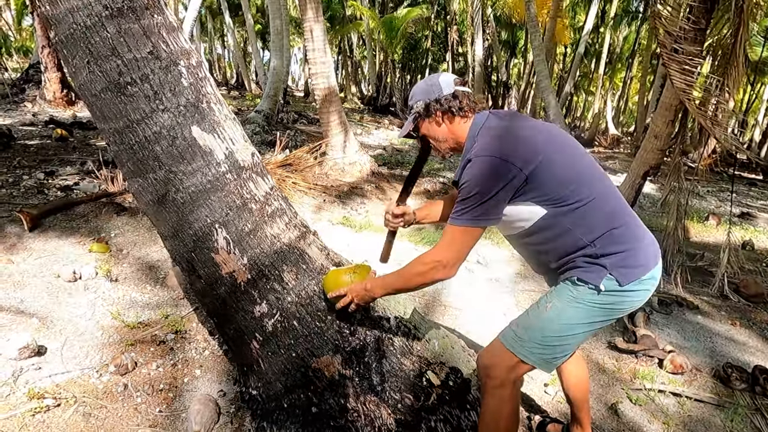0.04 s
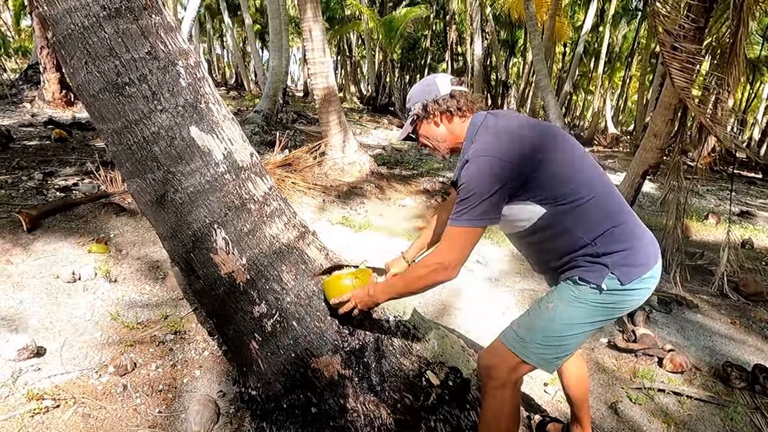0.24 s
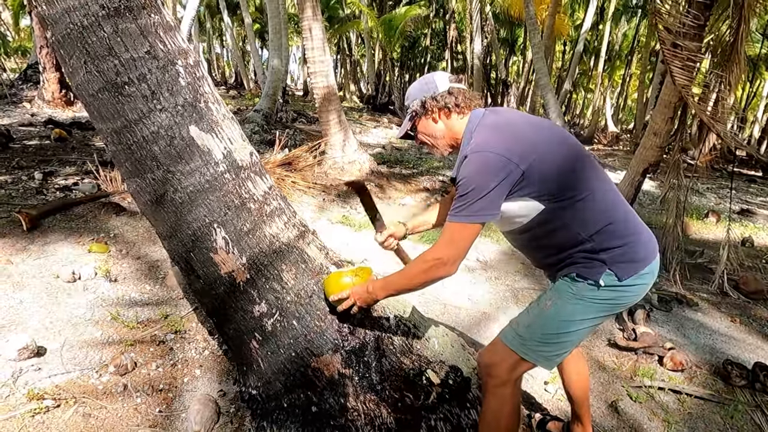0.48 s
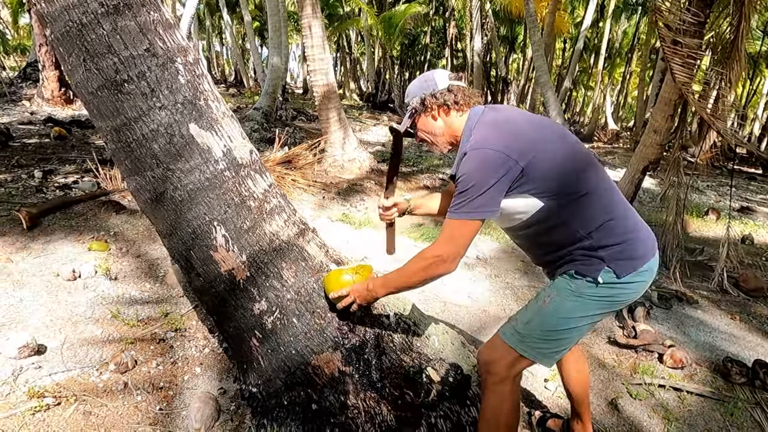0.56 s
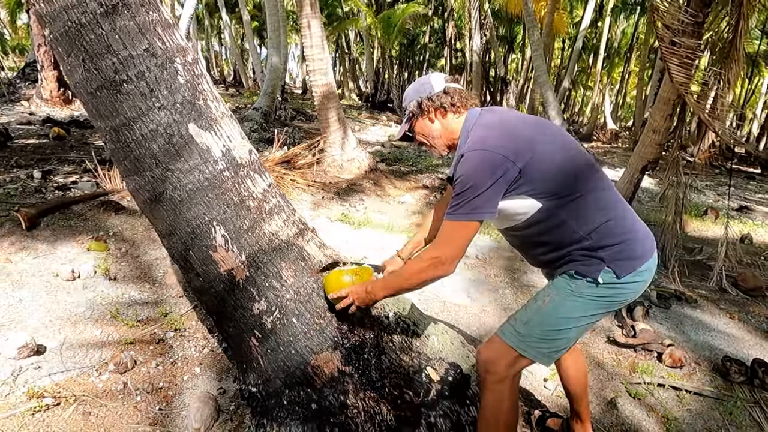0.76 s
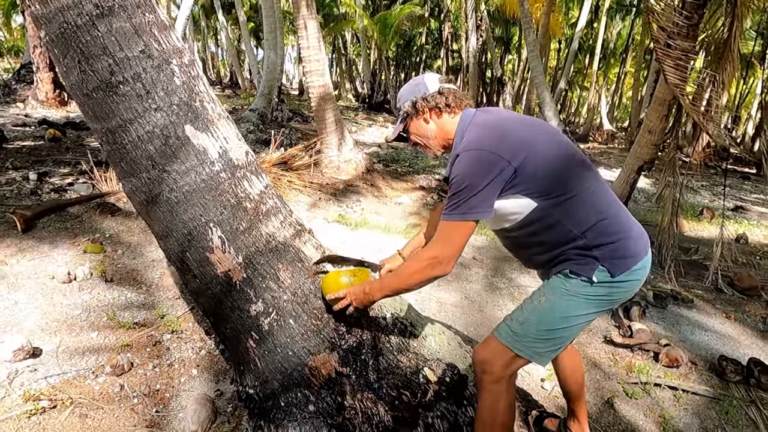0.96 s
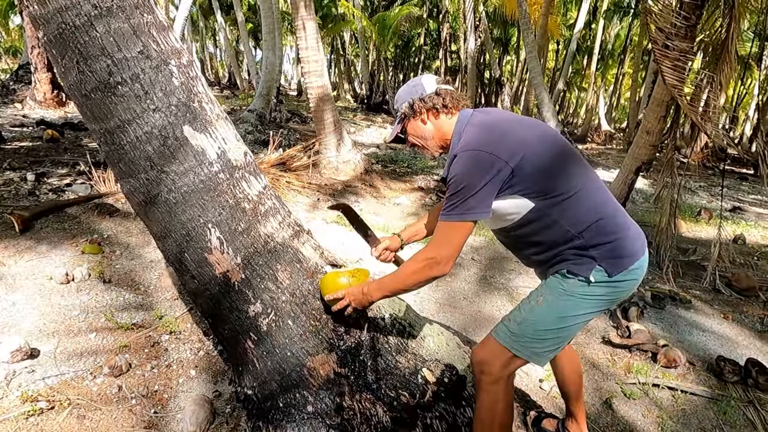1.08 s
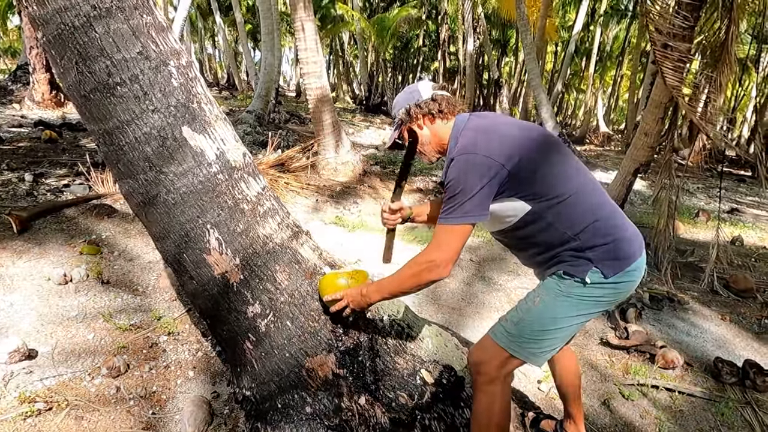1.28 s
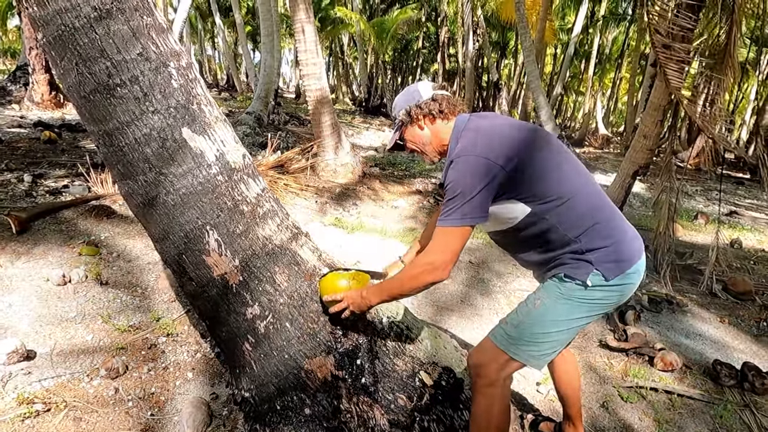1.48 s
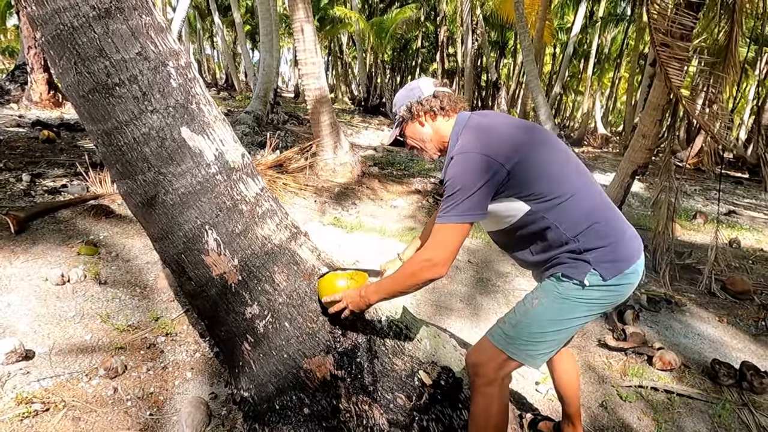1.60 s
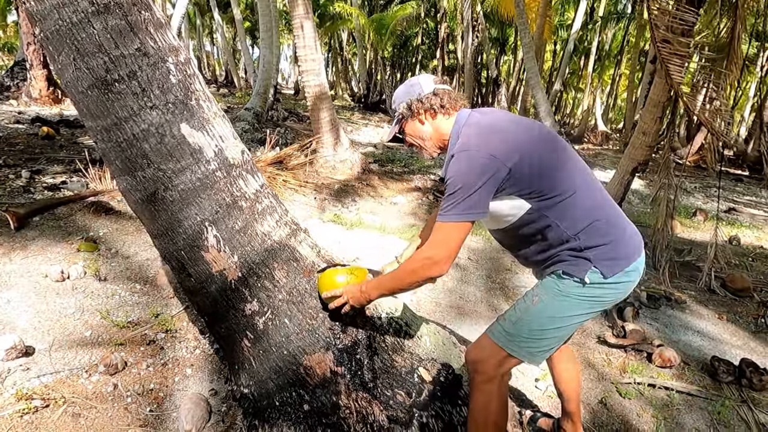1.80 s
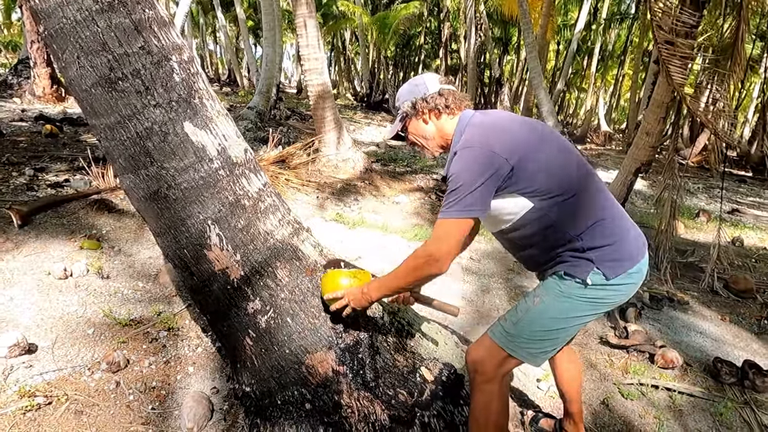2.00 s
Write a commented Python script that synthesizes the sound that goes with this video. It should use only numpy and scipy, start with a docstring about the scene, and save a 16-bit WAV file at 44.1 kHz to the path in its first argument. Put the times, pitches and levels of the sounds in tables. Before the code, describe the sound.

Three hard machete chops into a green coconut braced on a palm trunk, light wind behind

```python
"""Machete on a green coconut

Three machete chops into a green coconut held against a palm trunk, under an almost even wind hiss in the palms.
Each blow is filtered showers of random clicks for the husk fibres, damped sines for blade, nut and trunk,
then a second clack and knock as the blade bites deeper. Most of the small creaks and bumps follow the second
blow, as the blade is worked loose. Wind is shaped noise; a short decaying noise tail gives the blows an echo.
"""
import sys
import numpy as np
from scipy import signal
from scipy.fft import rfft, irfft
from scipy.io import wavfile

SR = 44100
rng = np.random.default_rng(int(sys.argv[2]) if len(sys.argv) > 2 else 0)


def inscribe(sig):
    """Save sig as 16-bit PCM at rate SR to the path in sys.argv[1].

    A 1-D sig is mono; a 2-D sig holds one channel per row.
    Samples are clipped to [-1, 1] before scaling.
    """
    pcm = np.round(np.clip(np.atleast_2d(sig).T, -1, 1) * 32767)
    wavfile.write(sys.argv[1], SR, pcm.astype(np.int16))


N = 90404
T = np.arange(N) / SR


def from_db(db):
    """Decibels to gain."""
    return 10 ** (np.asarray(db) / 20)


def rms_one(x):
    """Scale to unit rms."""
    return x / np.sqrt(np.mean(x ** 2) + 1e-20)


def colour(x, points, keep_power=True):
    """Causal, minimum-phase filter through (Hz, dB) points; keep_power evens out its overall gain."""
    size = 2 * N
    hz, db = np.transpose(points)
    bin_hz = np.arange(N + 1) * SR / size
    gain = from_db(np.interp(np.log(bin_hz + 1), np.log(hz), db))
    if keep_power:
        gain = rms_one(gain)
    # folding the cepstrum onto positive time makes the filter minimum-phase
    cepstrum = irfft(np.log(gain))
    cepstrum[1:N] *= 2
    cepstrum[N + 1:] = 0
    response = np.exp(rfft(cepstrum))
    return irfft(rfft(x, size) * response)[:N]


def low_pass(x, hz):
    """Gentle second-order roll-off."""
    sos = signal.butter(2, min(hz, 0.45 * SR), fs=SR, output="sos")
    return signal.sosfilt(sos, x + 1e-18)


def high_pass(x, hz):
    """Second-order low cut."""
    sos = signal.butter(2, hz, "high", fs=SR, output="sos")
    return signal.sosfilt(sos, x + 1e-18)


def since(s):
    """Time since an event, zero before it."""
    return np.maximum(T - s, 0)


def wind():
    """A nearly even hiss of palm leaves over a lumpy low rumble that comes and goes, both coloured noise."""
    # tone of the leaves: (frequency [Hz], relative level [dB])
    leaf_tone = [(20, -24), (50, -5.5), (110, -6), (180, -5), (310, -2.5), (450, -5), (650, -8),
                 (1100, -13), (1500, -12), (2700, -11.5), (4400, -14), (6000, -19.5), (8000, -25),
                 (10600, -32), (13000, -38.5), (16000, -33)]
    # slow drift of the leaf hiss: (time [s], level shift [dB])
    breeze = [(0, 0.5), (0.4, -0.2), (0.8, 0.25), (1.3, -0.16), (1.65, -1.5), (2.05, 0)]
    # low rumble of the wind, before its lumps: (time [s], level [dB])
    gusts = [(0, -65), (0.55, -51), (0.63, -34), (0.72, -40), (0.95, -39), (1.08, -39), (1.18, -41.5),
             (1.27, -36), (1.45, -37), (1.56, -54), (2.05, -49)]
    # tone of the rumble: (frequency [Hz], relative level [dB])
    rumble_tone = [(20, -19), (60, -7), (130, 0), (250, -3), (450, -13), (900, -26), (3000, -41),
                   (12000, -88)]
    leaves_db, lumps_db = -36, 2.5  # base level of the leaves; rms depth of the rumble's lumps

    leaf_level = from_db(leaves_db + np.interp(T, *np.transpose(breeze)))
    leaves = leaf_level * colour(rng.standard_normal(N), leaf_tone)
    lumps = rms_one(low_pass(rng.standard_normal(N), hz=15))
    rumble_level = from_db(np.interp(T, *np.transpose(gusts)) + lumps_db * lumps)
    rumble = rumble_level * colour(rng.standard_normal(N), rumble_tone)
    return leaves + rumble


def side_hiss():
    """Faint coloured noise, of opposite sign in the two ears, so they differ."""
    # filter gain: (frequency [Hz], gain [dB])
    side_tone = [(30, -73), (5000, -78.5), (10500, -74), (12300, -58), (14000, -62), (16000, -66)]
    hiss = colour(rng.standard_normal(N), side_tone, keep_power=False)
    return hiss * np.array([[1], [-1]])


def ring(s, modes):
    """Struck modes (Hz, dB, t60 s): sines dying away exponentially."""
    t = since(s)
    out = 0
    for hz, db, t60 in modes:
        decay = 1000 ** -np.minimum(t / t60, 10)
        out = out + from_db(db) * np.sin(2 * np.pi * hz * t) * decay
    return out


def snap(s, decay_s):
    """A first contact, then a dying shower of snapping fibres: one click, then random ones."""
    fibres_per_s, spread_db, edge_share = 16000, 2, 0.6  # edge_share weighs the first contact
    signs = rng.choice([-1, 1], N)
    sizes = from_db(spread_db * rng.standard_normal(N))
    grains = signs * sizes * (rng.random(N) < fibres_per_s / SR)
    decay = np.exp(-np.minimum(since(s) / decay_s, 20))
    shower = rms_one(grains * (T > s) * decay) / np.sqrt(N)  # unit energy
    shower[int(s * SR)] -= edge_share
    return shower * np.sqrt(decay_s * SR / 2)  # longer showers carry more energy


def thump(s, hz, rise_s, sag):
    """A heavily damped swing of the nut that swells, sinks sag octaves per second (if any) and stops."""
    steepness = 5.1  # of swell and fall
    t = since(s)
    pitch = hz * 2 ** (-abs(sag) * t) * (T > s)
    phase = 2 * np.pi * np.cumsum(pitch) / SR
    swell = t / rise_s * np.exp(1 - np.minimum(t / rise_s, 20))
    return np.sin(phase) * swell ** steepness


def chops():
    """The edge cracks into the husk, fibres crunch, the blade rings briefly, nut and trunk thump."""
    # blows: (time [s], crack level before its filters [dB], crack low edge [Hz], crunch level [dB],
    #   crunch decay [s], thump level [dB], thump start pitch [Hz], pitch sag [octaves/s],
    #   blade ring level [dB], blade pitch [Hz], blade ring t60 [s])
    blows = [(0.2323, -7.5, 2090, -15, 0.006, -8, 398, 97, -3, 2520, 0.011),
             (0.8377, -9, 700, -10, 0.0041, -5.5, 384, 107, -9, 3860, .018),
             (1.4867, -13.5, 3430, -13, 0.0061, -4.5, 362, 4.1, -12, 3760, 0.025)]
    # resonances of the trunk: (pitch [Hz], level relative to the thump [dB], t60 [s])
    trunk_modes = [(183.4, -22.5, 0.16), (245, -22.5, 0.065), (420, -81, 0.046), (720, -17.5, .05),
                   (830, -30.5, 0.035), (1210, -16.5, 0.038)]
    # tone of the crack: (frequency [Hz], relative level [dB])
    crack_tone = [(500, -24), (1600, -3), (2600, 7.5), (4000, 1), (6000, 2.5), (8000, 0.5), (10500, -3),
                  (16000, -16)]
    # tone of the crunch: (frequency [Hz], relative level [dB])
    crunch_tone = [(40, -26), (150, -6.5), (450, -5.5), (800, 5.5), (1250, 1.5), (1750, 1), (2600, -1),
                   (4000, 1), (5300, -4), (7500, -10.5), (16000, -28.5)]
    crack_decay_s, crunch_delay_s = 0.0012, 0.0012
    rise_s = 0.00424  # time for the thump to reach full swing

    cracks, crunches, body = 0, 0, 0
    for (s, crack_db, edge_hz, crunch_db, crunch_decay_s, thump_db, thump_hz, sag,
         blade_db, blade_hz, blade_t60) in blows:
        cracks = cracks + from_db(crack_db) * high_pass(snap(s, crack_decay_s), edge_hz)
        crunches = crunches + from_db(crunch_db) * snap(s + crunch_delay_s, crunch_decay_s)
        nut = thump(s, thump_hz, rise_s, sag)
        trunk = ring(s + rise_s / 2, trunk_modes)
        blade = ring(s + crunch_delay_s, [(blade_hz, blade_db, blade_t60)])
        body = body + from_db(thump_db) * (nut + trunk) + blade
    return colour(cracks, crack_tone) + colour(crunches, crunch_tone) + body


def bites():
    """A duller clack with a short woody knock follows each blow as the husk gives and rings."""
    # the blade bites deeper: (time [s], clack level before its filters [dB], decay [s], brightness [Hz],
    #   knock level [dB], knock pitch [Hz])
    deeper_cuts = [(0.245, -5.5, 0.0029, 4250, -3.5, 1750), (0.8582, -7, 0.0039, 5550, -9, 3170),
                   (1.5007, -21, 0.003, 4500, -13, 3300)]
    # what a bite sets ringing: (pitch [Hz], relative level [dB], t60 [s])
    husk_modes = [(858, -10, .03), (1040, -7, 0.031), (1334, -9, 0.027), (2325, -10.5, 0.038)]
    # tone of the clack: (frequency [Hz], relative level [dB])
    clack_tone = [(40, -22), (120, -13), (300, -2), (600, -8), (920, 0), (1300, -3), (1900, -3), (3200, -3),
                  (5000, -7), (8000, -13.5), (16000, -8)]
    knock_t60_s, husk_db = 0.01, -3.5  # husk_db shifts the husk ring from the clack's level

    clacks, knocks = 0, 0
    for s, db, decay_s, bright_hz, knock_db, knock_hz in deeper_cuts:
        clacks = clacks + from_db(db) * low_pass(snap(s, decay_s), bright_hz)
        knock = ring(s, [(knock_hz, knock_db, knock_t60_s)])
        husk = from_db(db + husk_db) * ring(s, husk_modes)
        knocks = knocks + knock + husk
    return colour(clacks, clack_tone) + knocks


def ticks():
    """Small ticks and creaks of blade and husk: fibre showers through one resonance each."""
    # (time [s], level before the resonance [dB], decay [s], pitch [Hz], bandwidth [Hz])
    creaks = [(0.2675, -47, 0.0032, 2000, 1500), (0.8513, -21, 0.00097, 4200, 2000),
              (0.8812, -25.5, 0.0064, 2000, 1800), (0.9227, -30.5, 0.014, 2000, 600),
              (0.9412, -18.5, 0.002, 4770, 3500), (0.9520, -32.5, 0.012, 1950, 450),
              (0.9965, -28, 0.0052, 1680, 1200), (1.0065, -31, .003, 3000, 2500),
              (1.5044, -27.5, 0.0067, 2370, 700), (2.0098, -27.5, .0015, 2700, 1200),
              (2.0300, -30, 0.01, 1950, 600), (2.0348, -24, .004, 1150, 800)]
    out = 0
    for s, db, decay_s, hz, width_hz in creaks:
        band = signal.iirpeak(hz, hz / width_hz, fs=SR)
        narrow = signal.lfilter(*band, snap(s, decay_s) + 1e-18)
        makeup = np.sqrt(SR / (np.pi * width_hz))  # narrow bands pass less energy
        out = out + from_db(db) * makeup * narrow
    return out


def bumps():
    """The nut shifts against the trunk: soft damped swings of steady pitch."""
    # (time [s], level [dB], pitch [Hz])
    shifts = [(0.978, -18, 221), (0.9903, -29, 199), (1.0140, -24, 183), (1.238, -24, 134),
              (1.2580, -35, 89), (1.4380, -23, 102)]
    rise_cycles = 1.1
    return sum(from_db(db) * thump(s, hz, rise_cycles / hz, sag=0) for s, db, hz in shifts)


def grove(x):
    """A faint, short, dull scatter from ground and trunks: convolution with decaying noise."""
    echo_db, t60_s, top_hz = -25, 0.13, 3400
    t = T[:SR // 2]
    tail = low_pass(rng.standard_normal(len(t)), top_hz) * 1000 ** (-t / t60_s)
    tail = tail / np.linalg.norm(tail)
    return from_db(echo_db) * signal.fftconvolve(x, tail)[:N]


def scene():
    """Everything sits in the centre except the faint side hiss."""
    handling = low_pass(ticks() + bumps(), hz=6150)
    work = chops() + bites() + handling
    return work + grove(work) + wind() + side_hiss()


def gain_control(x):
    """Each loud peak turns the gain down a little, smoothly; it creeps back at a steady rate in dB."""
    threshold_db, share = -6.5, 0.24  # share of the excess that is taken off
    release_db_per_s, attack_s = 17, 0.013
    level_db = 20 * np.log10(np.abs(x).max(axis=0) + 1e-9)
    over = np.maximum(level_db - threshold_db, 0) * share
    creep = release_db_per_s * T
    held = np.maximum.accumulate(over + creep) - creep
    r = np.exp(-1 / (attack_s * SR))
    reduction_db = signal.lfilter([1 - r], [1, -r], held)
    return x * from_db(-reduction_db)


def record(dry):
    """The microphone thins deep bass and notches treble; the gain ducks, peaks are rounded, the top is cut."""
    # microphone response: (frequency [Hz], gain [dB])
    microphone = [(7100, 0), (8000, -5.5), (8800, -9), (9150, -18.5), (9500, -4.5), (10100, -2),
                  (10750, 4.5), (11550, -9), (12400, -9), (13200, -7), (14000, -20), (16000, -26)]
    heard = np.array([colour(channel, microphone, keep_power=False) for channel in dry])
    heard = gain_control(high_pass(heard, hz=40))
    heard = heard / (1 + (heard / 0.9) ** 8) ** (1 / 8)  # rounds peaks off towards 0.9
    top_cut = signal.ellip(10, 0.1, 80, 15700, fs=SR, output="sos")  # steep, at 15.7 kHz
    return signal.sosfilt(top_cut, heard)


dry = scene()
out = record(dry)
inscribe(out)
```